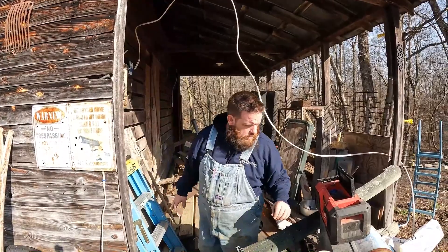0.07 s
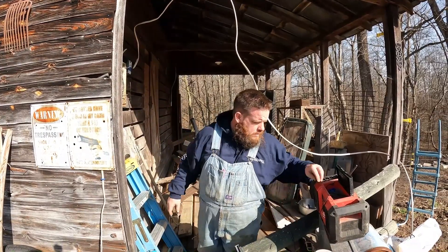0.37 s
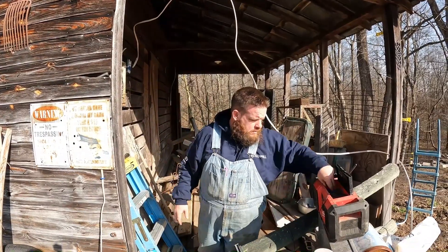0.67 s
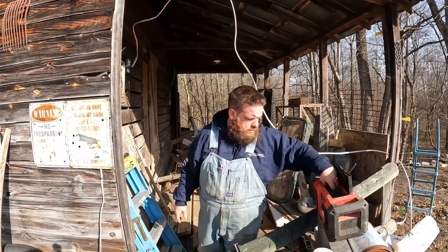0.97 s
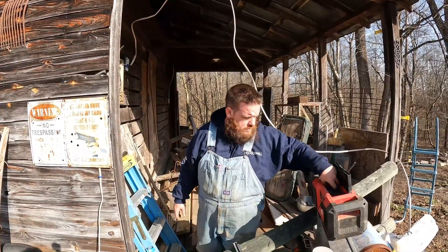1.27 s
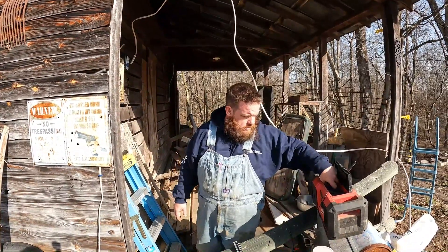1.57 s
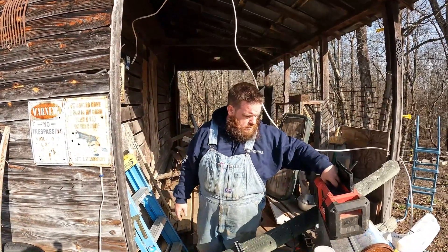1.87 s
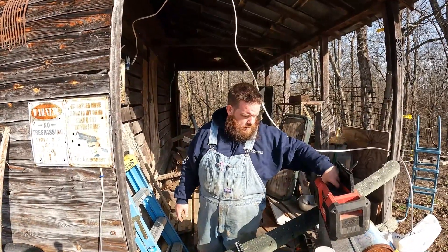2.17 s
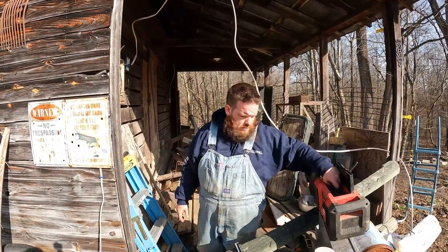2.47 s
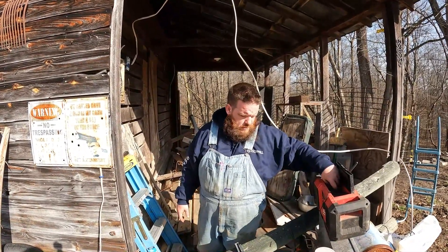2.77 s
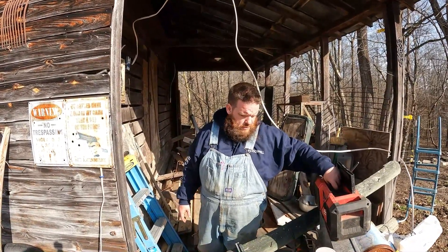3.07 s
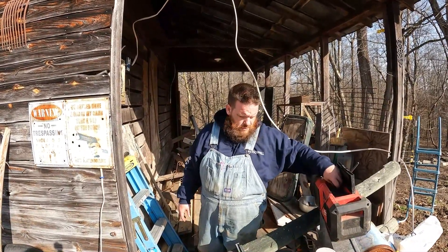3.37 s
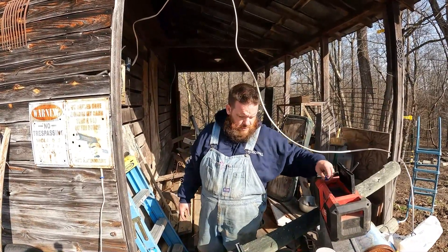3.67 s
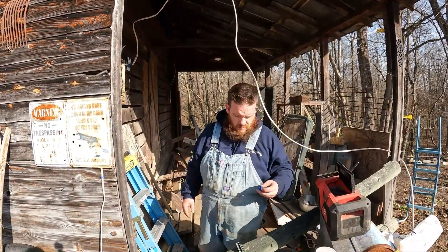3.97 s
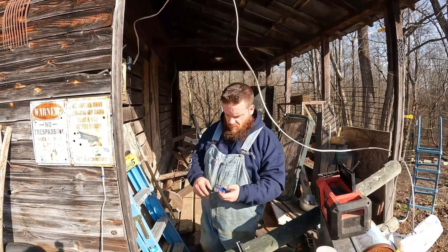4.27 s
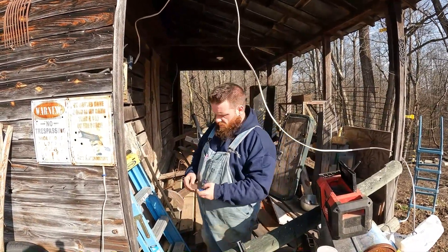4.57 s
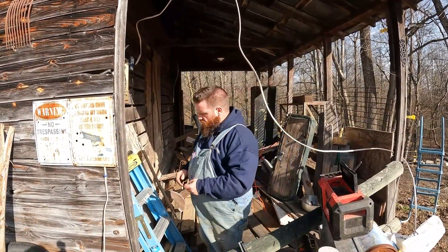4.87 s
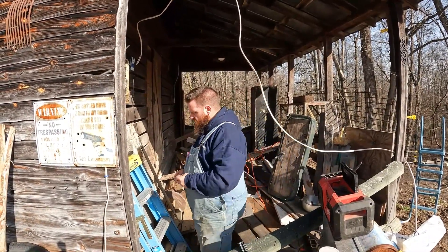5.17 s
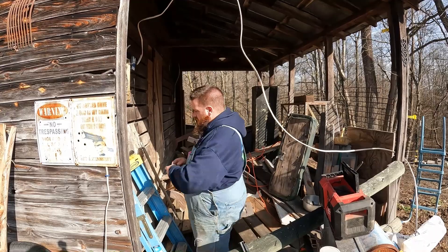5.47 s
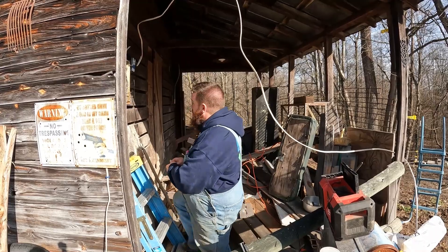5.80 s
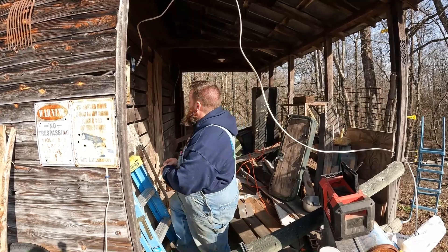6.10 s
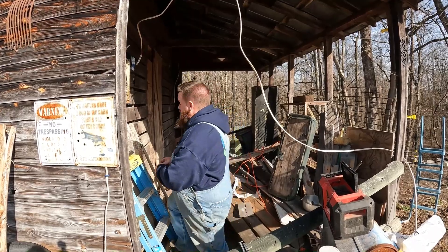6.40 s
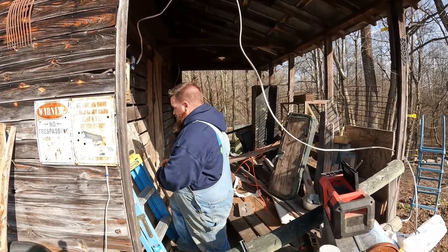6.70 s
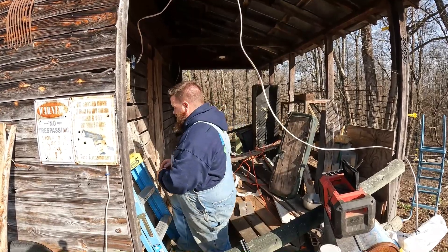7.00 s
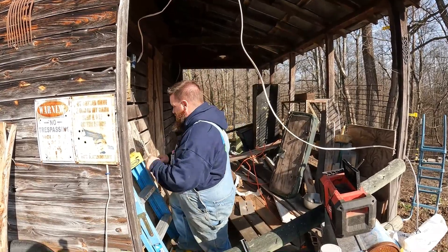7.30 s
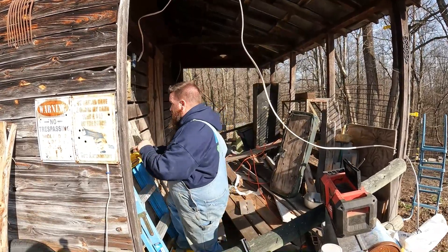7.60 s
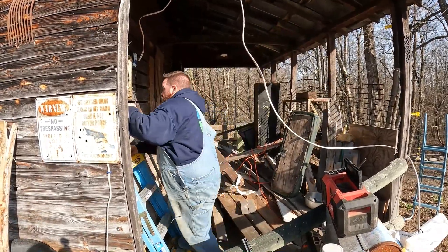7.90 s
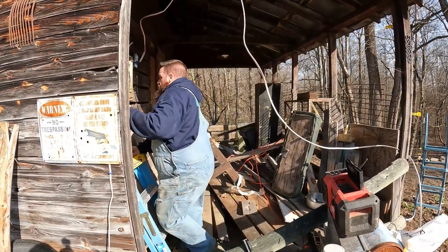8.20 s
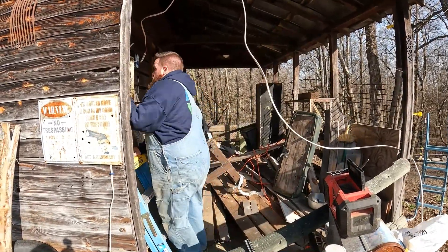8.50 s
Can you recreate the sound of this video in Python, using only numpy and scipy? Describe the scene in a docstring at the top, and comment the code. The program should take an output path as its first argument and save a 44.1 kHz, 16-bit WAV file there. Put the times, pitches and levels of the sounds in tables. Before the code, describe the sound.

Wind rumbles and thumps on a stereo microphone in an open shed, with trees and distant traffic faint behind it. Small metal parts rattle, tick and knock hollowly in a plastic box as a hand searches through them, just right of centre. The rummaging stops, and soft cloth rustling, short scuffs and a few clusters of clattering knocks on wood follow, just left of centre.

```python
"""An open wooden shed in the woods, heard from a stereo microphone with two close ports.
To the right a hand rummages through small metal hardware, which clinks and knocks on its plastic box.
Then, to the left by a ladder, clothes rustle, soles and sleeves scuff and things knock on the boards.
Gusts buffet the microphone, harder on the right, over the hush of the trees and tyres on a far road."""
import sys
import numpy as np
from scipy import signal
from scipy.fft import rfft, irfft, next_fast_len
from scipy.io import wavfile
from scipy.ndimage import uniform_filter1d

SR = 44100
rng = np.random.default_rng(int(sys.argv[2]) if len(sys.argv) > 2 else 0)


def transcribe(signal):
    """Save signal, clipped to [-1, 1], as a 16-bit WAV file at the path in sys.argv[1]."""
    frames = np.atleast_2d(signal).T
    limited = np.clip(frames, -1, 1)
    pcm = np.round(limited * 32767).astype(np.int16)
    wavfile.write(sys.argv[1], SR, pcm)


N = 381465

# modes of the plastic box: f/Hz, level/dB, t60/s
BOX_MODES = [(603, -7.5, 0.044), (703, 10, 0.027), (1185, 14.5, 0.051), (1350, 3, 0.084), (1770, -4, 0.042),
             (2285, -12.5, 0.12), (2920, 3.5, 0.028)]
# spectrum of small metal parts touching: f/Hz, level/dB
TICK_SPECTRUM = [(4500, -8), (7000, -4.5), (9000, -7), (12500, -9.5), (14500, -11.5), (16000, -50)]
# spectrum of loose things clattering: f/Hz, level/dB
CLATTER_SPECTRUM = [(200, 0.5), (520, -2), (750, -3.5), (1050, 2), (1400, -0.5), (1600, -3.5), (1950, -4.5),
                    (2350, -18.5), (2700, -9.5), (4000, -29.5), (7000, -43)]
BAND_LIMIT_HZ = 15700
SIDES = np.array([[1], [-1]])  # left, right


def gain_of(db):
    """Decibels to amplitude."""
    return 10 ** (np.asarray(db) / 20)


def unit_rms(x):
    """Scales to an rms of one."""
    return x / np.sqrt(np.mean(x ** 2) + 1e-20)


def unit_hit(x):
    """Scales a short sound to the energy of 20 ms at an rms of one."""
    return x * np.sqrt(.02 * SR / (np.sum(x ** 2) + 1e-20))


def value_at(points, hz):
    """Reads (f, value) points on a log-frequency axis."""
    f, value = np.transpose(points)
    return np.interp(np.log(hz + 1), np.log(f + 1), value)


def fader(curve):
    """A gain for every sample from (t, level) points."""
    times, db = np.transpose(curve)
    return gain_of(np.interp(np.arange(N) / SR, times, db))


def swells(rows, rise_s, fall_s, column=2):
    """A gain in which each row (start, length, level, ..) rises, holds and falls; their powers add."""
    t = np.arange(N) / SR
    power = np.zeros(N)
    for row in rows:
        start, length = row[:2]
        outside = np.maximum((start - t) / rise_s, (t - start - length) / fall_s)
        power += gain_of(row[column]) ** 2 * np.exp(-2 * np.clip(outside, 0, 20))
    return np.sqrt(power)


def lumps(seconds, depth_db):
    """A gain that wanders at random, each rise lasting about the given time."""
    size = int(seconds * SR)
    drift = uniform_filter1d(uniform_filter1d(rng.standard_normal(N), size), size)
    return unit_rms(gain_of(depth_db * np.tanh(unit_rms(drift))))


def steadied(x, seconds):
    """Takes the slow swells out of noise, leaving its fast lumps."""
    return x / np.sqrt(uniform_filter1d((x ** 2).mean(0), int(seconds * SR)) + 1e-6)


def add(mix, s, sound):
    """Mixes a sound in at time s."""
    part = mix[max(round(s * SR), 0):][:len(sound)]
    part += sound[:len(part)]


def colour(x, spectrum):
    """Causal filter with the given spectrum."""
    size = next_fast_len(x.shape[-1] + 4096)
    log_gain = np.log(gain_of(value_at(spectrum, abs(np.fft.fftfreq(size, 1 / SR)))))
    response = np.exp(np.conj(signal.hilbert(log_gain)))
    return np.fft.ifft(np.fft.fft(x, size) * response).real[..., :x.shape[-1]]


def stereo_noise(spectrum, spread):
    """Coloured noise, shared by both ports but for a small side signal."""
    mid, side = colour(rng.standard_normal((2, N)), spectrum)
    return unit_rms(mid) + spread * unit_rms(side) * SIDES


def grains(per_s, spread_db):
    """Sparse clicks of uneven size."""
    size = gain_of(spread_db * np.minimum(rng.exponential(1, N), 4))
    return unit_rms(size * rng.choice([-1, 1], N) * (rng.random(N) < per_s / SR))


def friction(spectrum, per_s, spread_db):
    """Many tiny contacts merging into a coloured hiss."""
    return unit_rms(colour(grains(per_s, spread_db), spectrum))


def ring(modes, t, uneven_db=0):
    """Dying modes from t = 0, weighted at random as by where the blow lands."""
    hz, db, t60 = np.transpose(modes)[:, :, None]
    age = np.maximum(t, 0)
    weight = gain_of(db + uneven_db * rng.standard_normal(hz.shape)) * rng.choice([-1, 1], hz.shape)
    return unit_hit((weight * gain_of(-60 * age / t60) * np.sin(2 * np.pi * hz * age)).sum(0))


def burst(spectrum, t, fall_s, rise_s=.0001):
    """Gritty noise of two hard surfaces meeting at t = 0."""
    envelope = np.exp(-np.maximum(-t / rise_s, t / fall_s))
    grit = rng.standard_normal(len(t)) * gain_of(2 * np.minimum(rng.exponential(1, len(t)), 4))
    return unit_hit(colour(grit * envelope, spectrum))


def resonate(x, hz, width_hz, ring_db):
    """A short noise together with the resonance that it excites."""
    band = signal.lfilter(*signal.iirpeak(hz, hz / width_hz, SR), x)
    return unit_hit(x + gain_of(ring_db) * unit_hit(band))


def bounce(x, within_s, size):
    """A loose piece touches three more times right after it lands."""
    out = x.copy()
    for late, strength in rng.random((3, 2)):
        add(out, within_s * late, size * strength * x)
    return unit_hit(out)


def wind():
    """Turbulence right at the ports: big slow eddies, smaller ones in the gusts, and single pops."""
    # breeze under the gusts: t/s, level/dB
    breeze_curve = [(0, -48.5), (1.1, -50.5), (1.9, -44.5), (2.45, -58), (3.2, -46.5), (3.55, -39),
                    (3.9, -62.5), (4.4, -63), (4.85, -40), (5.4, -37.5), (6.4, -43.5), (7.3, -35.5),
                    (7.65, -52), (8.05, -49.5), (8.6, -43)]
    # gusts: t/s, length/s, big eddies/dB, small eddies/dB
    gusts = [(0.35, 0.047, -43.5, -61.5), (0.85, 0.072, -48, -64.5), (1.35, 0.036, -41, -97),
             (1.585, 0.094, -35.5, -49.5), (1.89, 0.12, -44.5, -94), (2.04, 0.026, -31.5, -49.5),
             (2.845, 0.19, -32, -37.5), (3.295, 0.043, -28, -42), (3.37, 0.22, -41, -38),
             (4.6, 0.17, -43, -63.5), (4.95, 0.08, -32, -61), (5.235, 0.023, -28.5, -40.5),
             (5.325, 0.036, -25, -38), (5.825, 0.12, -25.5, -35.5), (5.98, 0.26, -29, -41),
             (6.045, 0.022, -40.5, -27), (6.28, 0.058, -63, -38.5), (6.5, .13, -27.5, -36),
             (6.66, 0.13, -37, -43), (6.775, 0.16, -32.5, -31.5), (7.03, 0.027, -27.5, -38),
             (7.1, 0.13, -40, -35.5), (7.21, 0.19, -36, -46.5), (8.13, 0.082, -40, -64.5),
             (8.37, 0.029, -32, -46.5), (8.58, .1, -31, -55)]
    # single eddies popping: t/s, level/dB, half width/s
    eddies = [(1.743, -29, 0.0026), (2.053, -28.5, 0.0015), (2.971, -24, 0.0016), (3.007, -17.5, .0017),
              (3.047, -19.5, 0.0021), (3.395, -24, 0.0021), (3.517, -24, 0.0016), (5.245, -27.5, 0.0023),
              (5.864, -24, 0.0011), (6.056, -20, .0014), (6.787, -21.5, .0024), (6.892, -22, 0.0022),
              (7.107, -21.5, 0.0016), (8.378, -31, 0.00091), (8.627, -27.5, 0.0012)]
    # spectra of the eddies, largest to smallest: f/Hz, level/dB
    rumble_spectrum = [(10, -15.5), (25, 2), (47, 0), (65, -8), (90, -17.5), (140, -28), (260, -54.5),
                       (500, -100)]
    buffet_spectrum = [(25, -28.5), (55, -3), (80, 5.5), (110, -2.5), (160, -14.5), (260, -38), (500, -90)]
    flutter_spectrum = [(40, -16), (90, 2.5), (130, 4.5), (170, -3), (230, -10.5), (300, -29), (400, -34.5),
                        (600, -41), (1200, -99.5)]
    fringe_spectrum = [(100, -6), (190, 3.5), (250, -7), (320, -11.5), (420, -33.5), (600, -43.5),
                       (1200, -78.5)]
    breeze = fader(breeze_curve) * lumps(.039, depth_db=4)
    big = swells(gusts, rise_s=.0076, fall_s=.023)
    thumps = steadied(lumps(.016, depth_db=6.5)[None], .11)
    small = swells(gusts, rise_s=.0069, fall_s=.011, column=3) * thumps
    rumble = np.hypot(breeze, big) * steadied(stereo_noise(rumble_spectrum, spread=.099), .078)
    buffet = np.sqrt(big * small) * steadied(stereo_noise(buffet_spectrum, spread=.18), .04)
    flutter = steadied(stereo_noise(flutter_spectrum, spread=.15), .029)
    flutter *= np.hypot(gain_of(-15.5) * breeze, small)
    # the smallest eddies grow faster than the gust and strike mostly the right port
    fringe = gain_of(-43) * (small / gain_of(-34.5)) ** 1.58 * stereo_noise(fringe_spectrum, spread=.43)
    pops = np.zeros(N)
    for s, db, width in eddies:
        u = (np.arange(N) / SR - s) / width
        pops -= gain_of(db) * (1 - u ** 2) * np.exp(-u ** 2 / 2)
    return (rumble + buffet + flutter + pops) * gain_of([[-3.6], [2.4]]) + fringe * gain_of([[-7], [4]])


def trees():
    """Air moving through the bare trees around the shed."""
    # rise and fall of the hush: t/s, level/dB
    hush_curve = [(0, -62), (2.4, -64), (4.0, -65), (4.6, -61), (5.3, -64.5), (7.5, -65.5), (8.5, -62)]
    # its spectrum: f/Hz, level/dB
    hush_spectrum = [(240, -22.5), (400, -6), (552, -9), (623, 1), (796, -7.5), (1300, 1.5), (2360, -10),
                     (2670, -12), (3460, -15), (5150, -29.5), (7320, -24.5), (8280, -33.5), (10400, -37),
                     (11600, -35.5), (15500, -43.5)]
    return fader(hush_curve) * stereo_noise(hush_spectrum, spread=.41)


def far_road():
    """Traffic swells in the distance, and one car goes by with its tyres singing."""
    # rise and fall of the traffic: t/s, level/dB
    traffic_curve = [(0, -63.5), (1.5, -60.5), (2.4, -64.5), (3.1, -58), (4, -62.5), (5.5, -59.5),
                     (6.6, -67.5), (8.6, -59)]
    # spectra of the traffic and of the one car: f/Hz, level/dB
    road_spectrum = [(30, -13.5), (105, -1), (165, 8), (205, 4), (260, 0), (450, -11.5), (640, -10.5),
                     (790, -7), (880, -6), (1050, -6.5), (1300, -14.5), (2000, -29.5), (5000, -58)]
    tyre_spectrum = [(100, -26), (170, 7.5), (300, -26), (600, -18), (790, -4), (880, 2.5), (1000, -6.5),
                     (1300, -18), (3000, -60)]
    traffic = fader(traffic_curve) * stereo_noise(road_spectrum, spread=.41)
    nearest_s, half_width_s = 4.2, .67
    nearness = 1 / (1 + ((np.arange(N) / SR - nearest_s) / half_width_s) ** 2)
    return traffic + gain_of(-62.5) * nearness * stereo_noise(tyre_spectrum, spread=.3)


def clothes():
    """Fine friction of heavy cloth, swelling unevenly with each movement."""
    # movements of arms and body: t/s, length/s, level/dB
    moves = [(0.01, 0.029, -68.5), (0.34, 0.12, -74.5), (4.29, 0.17, -76), (4.63, 0.09, -76.5),
             (4.92, 0.36, -78.5), (5.41, 0.35, -74.5), (5.83, 0.088, -71.5), (7.76, 0.068, -75.5),
             (7.85, 0.14, -68), (8.03, 0.78, -70), (8.24, 0.037, -73)]
    # spectrum of rubbing cloth: f/Hz, level/dB
    cloth_spectrum = [(400, -31), (1300, 13.5), (3200, 11.5), (5200, -4.5), (7200, 6.5), (8500, -1),
                      (11500, -5), (15000, -21)]
    effort = swells(moves, rise_s=.029, fall_s=.02) * lumps(.03, depth_db=4.1)
    return effort * friction(cloth_spectrum, per_s=4000, spread_db=2)


def tap():
    """One light tap: a crisp contact tick, then a short hollow note."""
    # the tap: t/s, note level/dB, f/Hz, t60/s, tick level/dB
    touch = (0.072, -50.5, 1550, .015, -72)
    s, db, hz, t60, tick_db = touch
    out, t = np.zeros(N), np.arange(2000) / SR
    attack = -np.expm1(-t / .00044)
    note = unit_hit(attack * ring([(hz, 0, t60)], t))
    add(out, s, gain_of(db) * note + gain_of(tick_db) * burst(TICK_SPECTRUM, t, fall_s=.0016))
    return out


def hardware():
    """Each piece slides, knocks the box, clinks and ticks on its neighbours; the heap damps it fast."""
    # pieces shifting: t/s, knock level/dB, f/Hz, clink level/dB, f/Hz, tick level/dB, f/Hz,
    # slide (0 a clean hit, 1 a scrape)
    hits = [(0.747, -50.5, 1197, -62.5, 3470, -70.5, 7500, 0.12),
            (0.794, -71, 1420, -64, 3600, -65, 8900, 0.52),
            (0.804, -56.5, 1190, -59.5, 2900, -61, 9100, 0.18),
            (0.809, -60, 1880, -68, 3600, -69, 9400, .1), (0.816, -61, 700, -69, 3600, -76, 7000, .6),
            (0.825, -59.5, 2000, -68, 2600, -84, 9000, 0.2),
            (0.834, -61, 1170, -66.5, 4770, -67.5, 7200, 0.19),
            (0.855, -60, 680, -66, 3080, -70, 7500, 0.41), (0.866, -60, 696, -71, 3000, -74, 14000, .15),
            (0.88, -60.5, 1150, -66, 3420, -71, 14000, 0.18),
            (0.933, -79, 1190, -80, 3000, -77, 13000, 0.76),
            (0.97, -58, 2020, -69, 2930, -65.5, 11600, 0.17),
            (0.99, -55, 1300, -69, 2800, -74, 11000, 0.76), (0.998, -54, 1890, -64, 2800, -76, 9600, .45),
            (1.008, -47.5, 1120, -59, 2800, -87, 9500, .25),
            (1.011, -50.5, 1820, -76, 3000, -74, 9000, 0.84),
            (1.032, -57, 1150, -65, 2930, -68.5, 7000, 0.4), (1.038, -53, 1300, -67, 2900, -72, 6500, 0.17),
            (1.107, -61.5, 1120, -65, 2760, -72, 12600, 0.27),
            (1.125, -63, 1190, -66, 2900, -77, 9000, 0.23), (1.136, -61, 1900, -81, 3100, -82, 8600, .55),
            (1.284, -59.5, 1310, -90, 2550, -90, 8000, .5),
            (1.477, -63.5, 1170, -73, 2600, -62, 9700, 0.16),
            (1.631, -49, 1176, -72, 2800, -65, 10000, 0.058), (1.633, -48, 724, -82, 2900, -84, 9000, .05),
            (1.68, -77, 660, -85, 2510, -68, 12300, 0.82), (1.779, -61, 660, -63, 2970, -64.5, 7800, 0.69),
            (1.795, -64, 2020, -56.5, 3030, -61.5, 7600, 0.2),
            (1.833, -59, 1300, -71, 2600, -90, 9000, .15), (1.984, -64, 1200, -65, 3060, -68.5, 7650, 0.24),
            (2.199, -78, 700, -75, 4320, -73.5, 11900, 0.12),
            (2.282, -66, 1420, -55, 3960, -68, 11600, 0.04), (2.283, -75, 1420, -60, 4530, -73, 10000, .05),
            (2.292, -61, 1160, -60.5, 2800, -81, 10900, 0.37), (2.317, -64, 1400, -68, 2800, -92, 9000, .2),
            (2.333, -61.5, 1480, -68, 2500, -94, 9000, .3), (2.571, -77, 815, -68, 3000, -75, 7800, 0.71),
            (2.579, -77, 820, -68, 2980, -72, 7400, 0.17),
            (2.635, -56.5, 1350, -59.5, 4100, -65.5, 12500, 0.16),
            (2.638, -62, 1350, -56, 5000, -61, 11900, .06),
            (2.736, -77, 1400, -63.5, 4300, -66.5, 11700, 0.15),
            (2.76, -75, 1410, -72, 4500, -77, 11700, 0.1), (2.778, -76, 1400, -76, 4800, -78, 12700, .55),
            (2.94, -63, 714, -61, 3140, -83.5, 9800, 0.18), (3.056, -67, 1300, -79, 4300, -75, 10400, .5),
            (3.081, -70, 940, -76, 3430, -64.5, 10700, 0.67),
            (3.116, -52, 1120, -59, 2700, -85, 10000, 0.13),
            (3.12, -57.5, 2050, -65, 2400, -88, 10000, 0.32),
            (3.121, -54, 1330, -76, 2700, -100, 10000, 0.09), (3.163, -70, 640, -66, 2690, -69.5, 9800, 1),
            (3.293, -60.5, 1300, -64, 3230, -93, 10500, 0.65),
            (3.33, -71, 1240, -72, 3130, -80, 10500, 0.97)]
    # contact noise of a piece: f/Hz, level/dB
    clink_spectrum = [(1500, -12.5), (2400, 4), (3000, -4.5), (4200, 2), (5200, -1.5), (6000, 0),
                      (7200, -17), (9000, -2)]
    out, t = np.zeros(N), np.arange(-1500, 5000) / SR
    for s, knock_db, knock_hz, clink_db, clink_hz, tick_db, tick_hz, slide in hits:
        rise_s, fall_s = .0001 + .012 * slide ** 2, .0008 + .0125 * slide
        # a square hit rings hollow; a glancing one clatters and bounces
        glancing = min(slide / .19, 1)
        knock = ring([(knock_hz, 0, .02)], t) + gain_of(-2) * ring(BOX_MODES, t, uneven_db=.67)
        knock += gain_of(-5.5) * glancing * burst(CLATTER_SPECTRUM, t, fall_s)
        # the small box radiates little bass, and a knock hardly wakes modes far below its pitch
        low_cut_hz = max(480, .66 * knock_hz)
        knock = signal.lfilter(*signal.butter(3, low_cut_hz, "high", fs=SR), knock)
        clink = resonate(burst(clink_spectrum, t, fall_s, rise_s), clink_hz, width_hz=380, ring_db=8)
        knock = bounce(knock, within_s=.00606, size=.69 * glancing)
        body = gain_of(knock_db) * knock + gain_of(clink_db) * clink
        # soft contacts are dull: an octave less treble for each 27 dB less tick
        reach_hz = min(2.4 * clink_hz * 2 ** ((tick_db - clink_db) / 27), BAND_LIMIT_HZ)
        body = signal.sosfilt(signal.butter(6, reach_hz, fs=SR, output="sos"), body)
        tick = burst(TICK_SPECTRUM, t, fall_s, rise_s)
        tick = resonate(tick, tick_hz, width_hz=1700, ring_db=8 * slide)  # a sliding piece sings
        add(out, s + t[0], body + gain_of(tick_db) * tick)
    return out


def pings():
    """A piece that comes free of the heap rings on for a moment in two modes."""
    # freed pieces: t/s, lower level/dB, f/Hz, upper level/dB, f/Hz, t60/s
    pieces = [(0.746, -64, 3000, -84, 10400, 0.025), (1.091, -65, 2900, -76, 3650, .02),
              (1.108, -60.5, 2920, -66, 5100, 0.025), (1.632, -63, 8650, -62, 10300, 0.0092),
              (1.632, -64, 2820, -67, 2990, 0.025), (1.795, -59, 2870, -59.5, 4380, .03),
              (1.802, -64, 3880, -74, 7500, 0.02), (1.986, -65, 2940, -76, 4400, 0.028),
              (2.281, -64.5, 4270, -76, 6060, 0.014), (2.637, -56, 3060, -64, 4800, 0.021),
              (3.166, -80, 5400, -72, 7340, .016)]
    out, t = np.zeros(N), np.arange(5000) / SR
    for s, low_db, low_hz, high_db, high_hz, t60 in pieces:
        for db, hz in (low_db, low_hz), (high_db, high_hz):
            add(out, s, gain_of(db) * ring([(hz, 0, t60)], t))
    return out


def rattle():
    """Countless tiny contacts as the hand pushes through the heap; some of them ring the box."""
    # strokes of the hand: t/s, length/s, level/dB
    stirs = [(0.8, 0.033, -68), (0.96, 0.086, -72), (1.09, .06, -69), (1.33, 0.24, -73.5),
             (1.66, 0.16, -72.5), (2.42, 0.024, -73.5), (2.65, 0.12, -68.5), (2.9, 0.19, -76),
             (3.29, 0.056, -74)]
    # spectrum of the shifting heap: f/Hz, level/dB
    heap_spectrum = [(800, -13), (1300, -2), (3000, 2), (5200, -11), (7300, -10.5), (9000, -12.5),
                     (12500, -18), (15500, -31)]
    t = np.arange(N) / SR
    resting = gain_of(-81) * (t > .93) * (t < 3.6)  # the heap shifts faintly while the hand is in it
    effort = np.hypot(resting, swells(stirs, rise_s=.016, fall_s=.026))
    contacts = lumps(.066, depth_db=5.5) * friction(heap_spectrum, per_s=1100, spread_db=2)
    nudges = grains(per_s=81, spread_db=4.5)
    walls = unit_rms(signal.oaconvolve(nudges, ring(BOX_MODES, np.arange(2500) / SR))[:N])
    return effort * (contacts + gain_of(-10.5) * walls)


def fidgets():
    """Thin ticks of small parts that slide and touch in the fingers."""
    # touches: t/s, level/dB, slide before the touch/s
    touches = [(4.32, -81, .012), (4.433, -75, .0002), (4.68, -77, .012), (5.493, -75.5, 0.00021),
               (7.809, -62, .016), (8.134, -69, 0.0033)]
    out, t = np.zeros(N), np.arange(-2000, 2000) / SR
    for s, db, slide_s in touches:
        add(out, s + t[0], gain_of(db) * burst(TICK_SPECTRUM, t, fall_s=.007, rise_s=slide_s))
    return out


def knocks():
    """A hard crack, then the boards ring and loose things on them clatter; each spot has its pitch."""
    # blows: t/s, body level/dB, f/Hz, crack level/dB, f/Hz, snap level/dB, clatter decay/s
    blows = [(5.000, -58, 1200, -74, 3000, -80, 0.0045), (5.322, -65.5, 1200, -71, 3800, -69, 0.0087),
             (5.349, -59.5, 1200, -52.5, 4930, -53, 0.0055), (5.608, -64.5, 1210, -64, 3000, -76.5, .016),
             (6.025, -53, 1000, -61, 2200, -68, .012), (6.037, -41, 1180, -41, 2000, -48.5, .012),
             (6.05, -46.5, 1950, -66, 2200, -68, 0.011), (6.063, -46, 1310, -63, 2000, -77, .027),
             (6.128, -54.5, 1400, -57.5, 2800, -67, .007), (6.165, -52.5, 1910, -51.5, 3170, -70, .012),
             (6.18, -57, 750, -68, 2700, -80, .014), (6.236, -85, 1200, -72, 3000, -66.5, .022),
             (8.513, -48.5, 1280, -71, 3000, -87, 0.0046), (8.521, -48, 640, -78, 3000, -80, 0.007),
             (8.538, -40.5, 1240, -75, 2900, -76, 0.007), (8.554, -56, 1300, -57, 3200, -62.5, .012),
             (8.561, -48, 1750, -75, 3000, -82, .016), (8.586, -55.5, 1300, -78, 3000, -88, .016),
             (8.623, -46.5, 1190, -67.5, 3000, -78, .016)]
    # modes of the boards and of loose metal there: f/Hz, level/dB, t60/s
    board_modes = [(996, -5.5, 0.06), (1070, 5.5, 0.051), (1185, 16.5, 0.16), (1342, 21, 0.12),
                   (1570, 0, 0.11), (1870, 9, 0.16), (1910, 3.5, 0.063), (2020, 0.5, 0.13), (2137, 7, 0.14),
                   (2270, -12, 0.1)]
    metal_modes = [(3115, -6, .09), (4153, -3, .09), (4668, 2, .1), (7089, -3, .09), (7713, -2, .09)]
    # contact noise of the crack and of its bright snap: f/Hz, level/dB
    crack_spectrum = [(500, -7.5), (1500, -6.5), (2200, 4.5), (2800, -2), (3400, 1.5), (4200, -0.5),
                      (4700, -3), (5500, -7.5), (7100, 1), (8500, -35)]
    snap_spectrum = [(5000, -27.5), (7200, 4), (8300, -3), (10500, -4.5), (12000, -8.5), (13500, -16.5),
                     (16000, -17)]
    out, t = np.zeros(N), np.arange(-200, 10000) / SR
    for s, body_db, body_hz, crack_db, crack_hz, snap_db, clatter_s in blows:
        clatter = burst(CLATTER_SPECTRUM, t, fall_s=clatter_s, rise_s=.00025)
        clatter = resonate(clatter, body_hz, width_hz=340, ring_db=-.5)
        body = unit_hit(gain_of(-6) * ring(board_modes, t, uneven_db=.8) + clatter)
        crack = burst(crack_spectrum, t, fall_s=.0038, rise_s=.0002)
        crunch = gain_of(-3.5) * burst(crack_spectrum, t, fall_s=.016)
        crack = resonate(crack + crunch, crack_hz, width_hz=700, ring_db=0)
        crack += gain_of(-16) * ring(metal_modes, t, uneven_db=1.1)
        snap = burst(snap_spectrum, t, fall_s=.0065, rise_s=.0003)
        add(out, s + t[0], gain_of(body_db) * body + gain_of(crack_db) * crack + gain_of(snap_db) * snap)
    return out


def scuffs():
    """Short scrapes and swishes of soles and sleeves that swell and die away."""
    # scrapes and swishes: peak t/s, level/dB, rise/s, fall/s
    strokes = [(5.011, -52, 0.0076, 0.02), (5.059, -62.5, 0.0072, 0.016), (5.336, -52, 0.012, 0.015),
               (5.356, -50, 0.0059, 0.015), (6.244, -59, 0.02, 0.023), (7.93, -63, 0.013, 0.013),
               (8.172, -60.5, 0.013, 0.013), (8.545, -61, .012, .025)]
    # spectrum of the rubbing: f/Hz, level/dB
    scuff_spectrum = [(300, 5), (1200, 0), (3000, 0), (4600, -8.5), (5400, -8.5), (7300, -2.5),
                      (8500, -10.5), (11500, -11), (14000, -26), (16000, -44.5)]
    effort, t = np.zeros(N), np.arange(N) / SR
    for s, db, rise_s, fall_s in strokes:
        effort += gain_of(db) * np.exp(-np.maximum((s - t) / rise_s, (t - s) / fall_s))
    return effort * friction(scuff_spectrum, per_s=9000, spread_db=.98)


def shed(x):
    """Scattered reflections from roof and walls, each band dying at its own speed."""
    # decay of the shed: f/Hz, t60/s
    decay_times = [(200, 0.86), (1200, 0.14), (3000, 0.16), (5000, 0.11), (8000, 0.15), (15000, 0.046)]
    size, echoes_per_s, first_echo_s = SR // 2, 2500, .005
    echoes = rng.standard_normal((2, size)) * (rng.random((2, size)) < echoes_per_s / SR)
    echoes *= np.arange(size) > first_echo_s * SR
    hz, t, bands = signal.stft(echoes, SR, nperseg=256)
    decay = gain_of(-60 * t / value_at(decay_times, hz)[:, None])
    tail = signal.istft(bands * decay, SR, nperseg=256)[1]
    return signal.fftconvolve(x[None], tail / np.linalg.norm(tail[0]), axes=1)[:, :N]


def placed(x, pan_db, wet_db, spread):
    """Direct sound to one side (positive is left), with reflections much alike at both ports."""
    mid, side = shed(x)
    return x * gain_of(pan_db * SIDES / 2) + gain_of(wet_db) * (mid + spread * side * SIDES)


def scene():
    """From the microphone: the box a little right, the ladder a little left, the tap further left."""
    box = placed(hardware() + pings() + rattle(), pan_db=-2, wet_db=-14, spread=.55)
    ladder = placed(knocks() + scuffs() + clothes() + fidgets(), pan_db=1, wet_db=-11.5, spread=.24)
    left_tap = placed(tap(), pan_db=7, wet_db=-15, spread=.6)
    return box + ladder + left_tap + wind() + trees() + far_road()


def record(dry):
    """Two close ports slightly out of phase, then the recorder's band limit."""
    # phase between the ports: f/Hz, lead of the left/rad
    port_phase = [(300, 0.13), (900, 0.098), (1600, -0.5), (3000, -0.68), (4200, -0.053), (7500, -0.44),
                  (10000, -0.53), (15000, -0.19)]
    size = next_fast_len(N + 2048)
    hz = np.fft.rfftfreq(size, 1 / SR)
    turn = np.exp(1j * value_at(port_phase, hz) * SIDES / 2)
    # treble glancing off nearby surfaces, 1.1 ms late, ripples the two ports in opposite ways
    treble = np.clip((hz - 2500) / 2000, 0, 1)
    echo = .28 * treble * np.exp(-2j * np.pi * hz * .0011)
    ports = irfft(rfft(dry, size) * (turn + echo * SIDES), size)[:, :N]
    low_pass = signal.firwin(511, BAND_LIMIT_HZ, window=("kaiser", 9), fs=SR)
    return signal.oaconvolve(ports, low_pass[None], "same")


dry = scene()
out = record(dry)
transcribe(out)
```